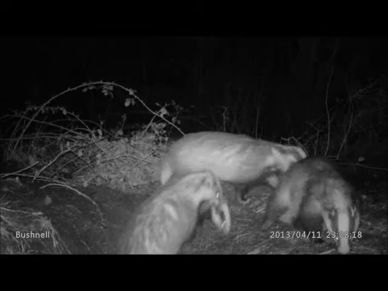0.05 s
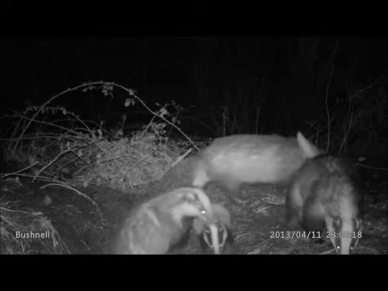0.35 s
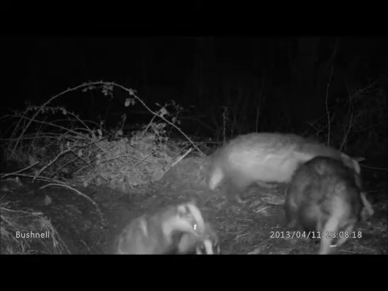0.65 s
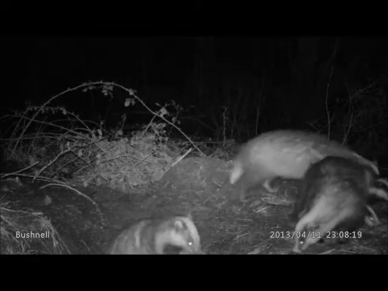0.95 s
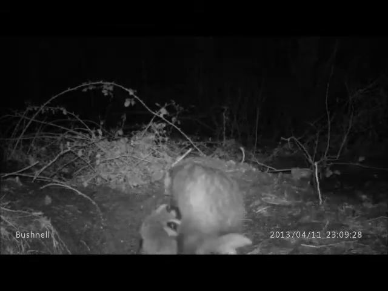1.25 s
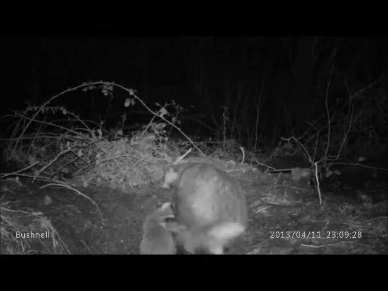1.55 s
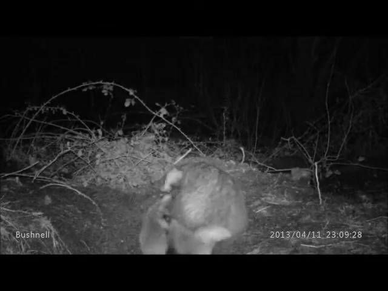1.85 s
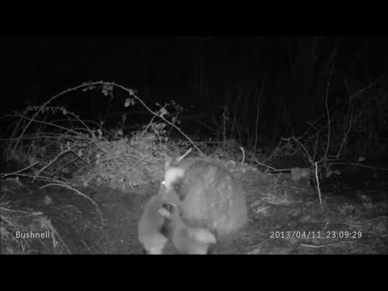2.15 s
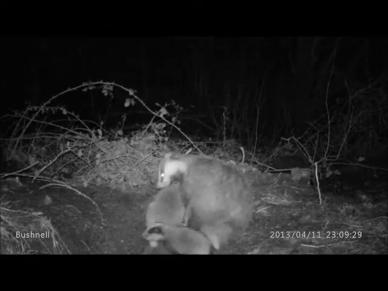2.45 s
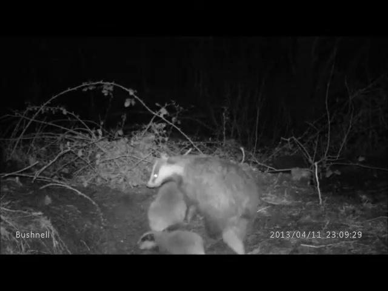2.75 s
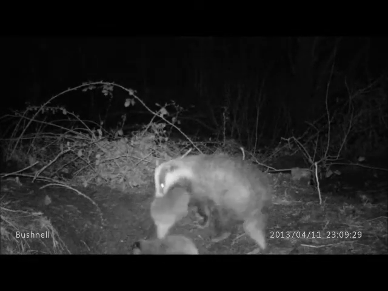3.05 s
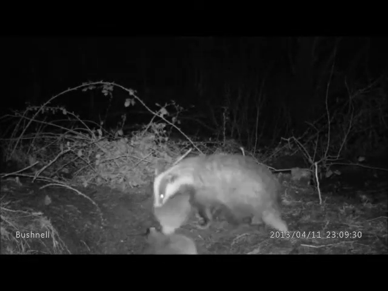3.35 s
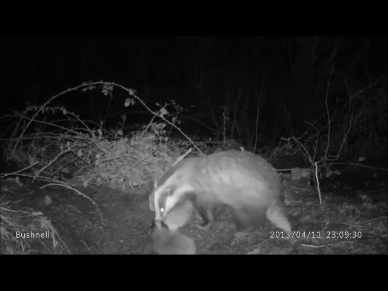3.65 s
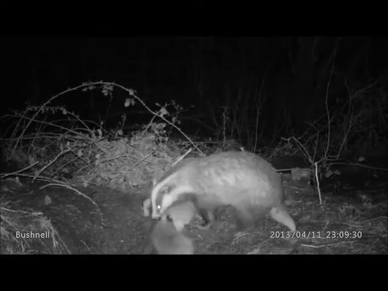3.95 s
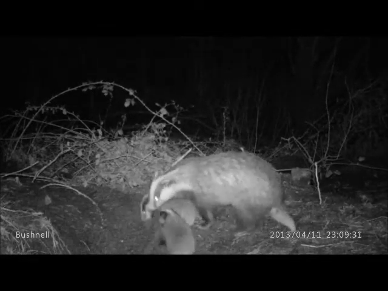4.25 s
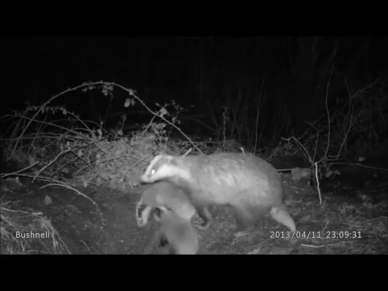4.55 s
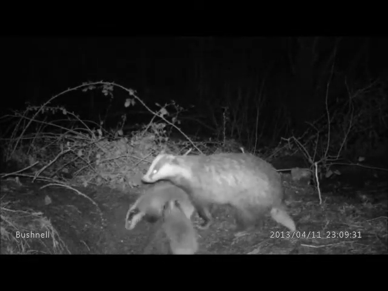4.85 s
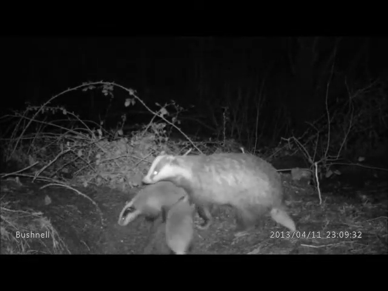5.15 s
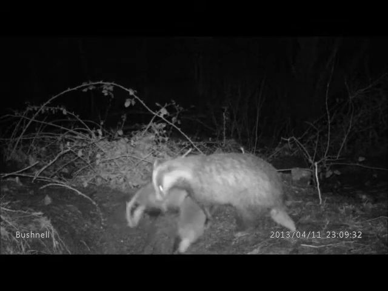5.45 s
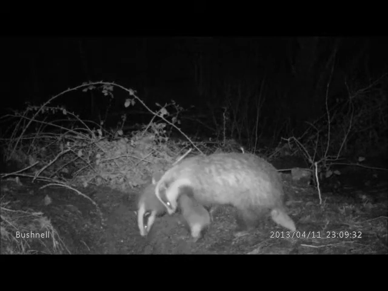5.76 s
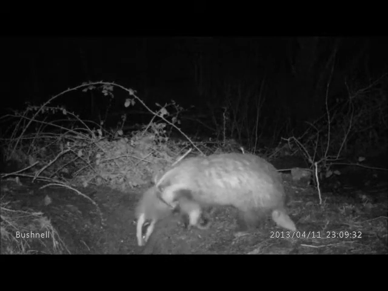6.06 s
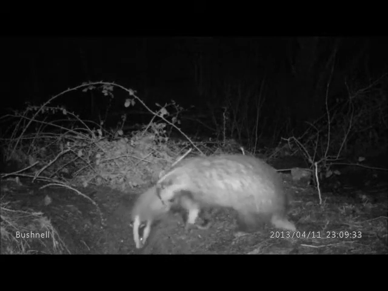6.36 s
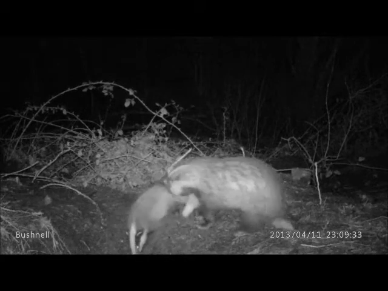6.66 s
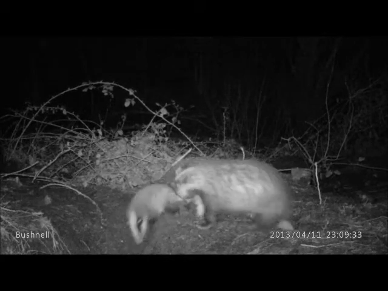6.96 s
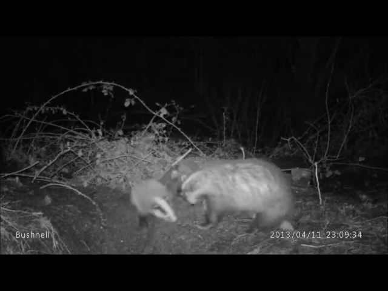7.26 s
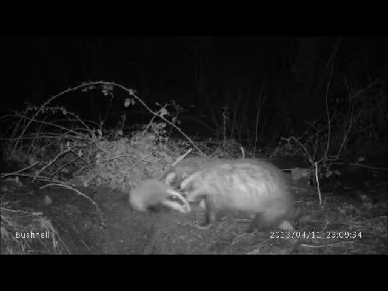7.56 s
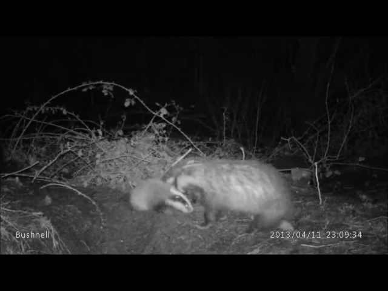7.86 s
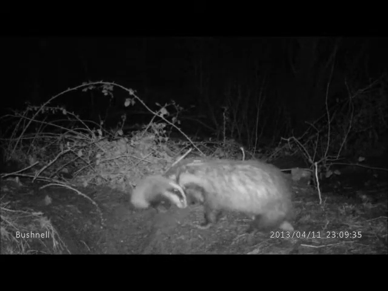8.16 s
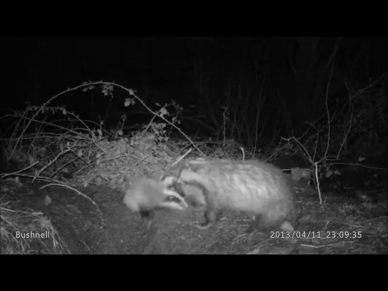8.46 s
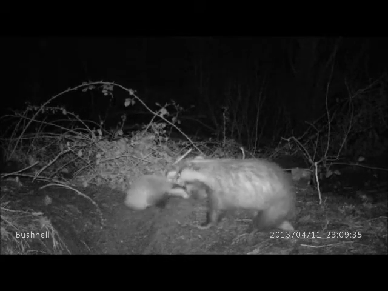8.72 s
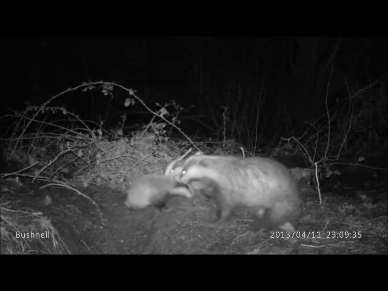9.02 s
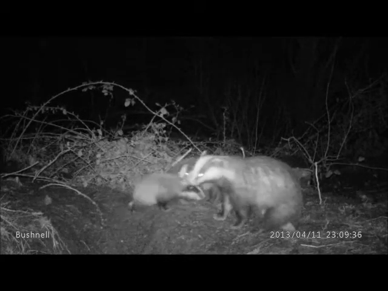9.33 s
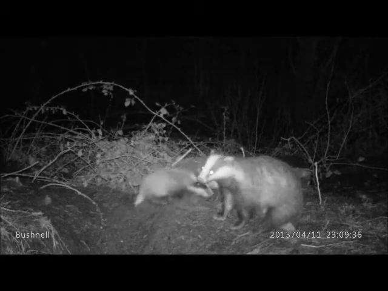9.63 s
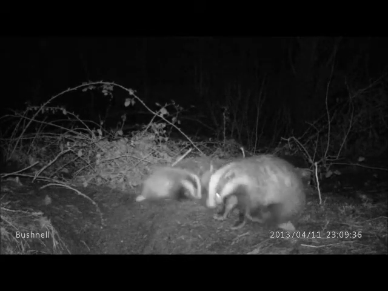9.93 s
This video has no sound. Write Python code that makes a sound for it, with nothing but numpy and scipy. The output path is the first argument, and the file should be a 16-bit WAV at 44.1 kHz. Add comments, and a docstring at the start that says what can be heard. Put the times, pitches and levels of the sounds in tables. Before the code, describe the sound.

Badgers are heard close to a trail camera in quiet woodland at night. Soft hiss, a thin high whine and a faint distant murmur run throughout, and the camera adds repeated runs of short, buzzy electrical ticks. A brief yelp comes right at the start and another at about 1 second, while paws crackle in dry litter and a few stalks snap, most sharply at 0.7 seconds. At 1.3 seconds the sound drops out for an instant with a click. From 2.4 seconds a cub chitters in high, raspy bursts of about eleven syllables a second, with occasional sharp squeaks and dull scuffles on the soil. The calls thin out between 4 and 6 seconds, then pick up until about 7. A soft grunt comes at 7.5 seconds. The longest, loudest chitter lasts from about 8.2 to 9.5 seconds. Everything sounds thin, with a gritty treble edge.

```python
"""Badgers at night, heard through a trail camera that hisses, whines and buzzes when it writes to its card.
First come two short yelps, while paws press into dry litter and snap a few stalks. At 1.3 s the camera
mutes briefly. From 2.4 s a cub chitters in bursts, quick pulses ringing in its throat, between scuffles
on the soil. A soft grunt comes at 7.5 s, then the longest, loudest chitter. All along, the night air
murmurs, and the camera holds each of its samples, which mirrors every sound into the treble."""
import sys
import numpy as np
from scipy import signal
from scipy.fft import rfft, irfft
from scipy.io import wavfile
from scipy.ndimage import uniform_filter1d

SR = 44100
rng = np.random.default_rng(int(sys.argv[2]) if len(sys.argv) > 2 else 0)


def to_wav(s):
    """Save 16-bit WAV."""
    ch = np.atleast_2d(s).T  # columns
    pcm = np.round(np.clip(ch, -1, 1) * 32767)  # PCM
    wavfile.write(sys.argv[1], SR, pcm.astype(np.int16))


N = 440559
TIME = np.arange(N) / SR


def undb(db):
    """Turn decibels into a number to multiply by."""
    return 10 ** (np.asarray(db) / 20)


def unit(x):
    """Scale a sound to an average (rms) size of 1."""
    return x / np.sqrt(np.mean(x ** 2) + 1e-20)


def curve(rows):
    """Join (time [s], value) rows by straight lines."""
    return np.interp(TIME, *np.transpose(rows))


def add(out, s, x):
    """Mix x into out, starting at s seconds."""
    i = max(int(s * SR), 0)
    out[i:i + len(x)] += x[:N - i]


def resonate(x, hz, width_hz):
    """A resonance: keep the sound near hz and weaken the rest."""
    return signal.lfilter(*signal.iirpeak(hz, hz / width_hz, fs=SR), x)


def noise(points):
    """Noise shaped by (frequency [Hz], level [dB per Hz]) points."""
    hz, db = np.transpose(points)
    grid = np.maximum(np.fft.rfftfreq(N, 1 / SR), 1)
    gain = undb(np.interp(np.log(grid), np.log(hz), db))
    return irfft(rfft(rng.standard_normal(N)) * gain, N) * np.sqrt(SR / 2)


def wander(rate):
    """Drift by about 1 either way, to a new random value rate times a second."""
    step = int(SR / rate)
    return uniform_filter1d(np.repeat(rng.standard_normal(N // step + 1), step), step)[:N]


def envelope(age, attack_s, length_s, release_s):
    """Rise smoothly, hold until length_s, then die away."""
    rise = np.sin(np.pi / 2 * np.clip(age / attack_s, 0, 1)) ** 2
    return rise * np.exp(-np.maximum(age - length_s, 0) / release_s)


def pip(hz, rise_s, glide, rasp):
    """A tiny tone that swells, fades and can slide in pitch, with a hoarse puff just above it."""
    age = np.arange(int(7 * rise_s * SR)) / (rise_s * SR)  # 1 at the loudest point
    phase = 2 * np.pi * (np.cumsum(hz * (1 + glide * (age - 1))) / SR + rng.random())
    puff = unit(resonate(resonate(rng.standard_normal(len(age)), hz + 500, 1600), hz + 500, 2200))
    return (age * np.exp(1 - age)) ** 2 * (np.sin(phase) + rasp * puff)


def hiss_and_whine():
    """The camera's own soft hiss and thin whine, both wavering a little."""
    # the hiss from bass to treble: (frequency [Hz], relative level [dB])
    hiss_shape = [(40, -73.5), (130, -78.5), (220, -82.5), (420, -89), (560, -88.5), (800, -87),
                  (1250, -95.5), (1550, -97.5), (2050, -96.5), (2500, -99.6), (3200, -96), (4100, -96),
                  (4700, -99.8)]
    hiss = noise(hiss_shape) * undb(-2.15 + .5 * wander(5))
    whine_hz = 5169 + 5 * wander(30)
    return hiss + undb(-72) * np.sin(2 * np.pi * np.cumsum(whine_hz) / SR)


def card_writes():
    """Give (time [s], blocks) for each write; the camera then waits one fill time per block stored."""
    # rounds of writing to the card: (start [s], two-block writes [count], one-block writes [count])
    write_rounds = [(.231, 1, 4), (1.399, 0, 2), (1.798, 2, 0), (2.369, 1, 0), (2.599, 0, 5), (3.402, 2, 5),
                    (4.733, 2, 5), (6.067, 2, 7), (7.672, 2, 5), (9.009, 2, 3)]
    fill_s = .1338
    for s, long_count, short_count in write_rounds:
        for blocks in [2] * long_count + [1] * short_count:
            yield s, blocks
            s += blocks * fill_s


def card_buzz(surge_db, sag_db, fizz_db, surge_s, sag_s):
    """Each block opens with a spike; its two parts (sectors) each jolt the power up and down twice."""
    block_s, sector_s = .0168, .0077
    surge_times, sag_times = (.0021, .0044), (.0057, .0072)  # seconds into a sector
    t = TIME[:SR // 300]
    surge = np.exp(-t / surge_s)
    sag = np.exp(-(t / sag_s - 1) ** 4)
    spike = -undb(-31.8) * np.exp(-t / .00005)
    out = np.zeros(N)
    for s, blocks in card_writes():
        add(out, s + .013, .7 * spike)
        for block in range(blocks):
            start = s + block * block_s
            add(out, start + .0003, spike / (1 + block))
            for sector in (start, start + sector_s):
                for up, down in zip(surge_times, sag_times):
                    add(out, sector + up, undb(surge_db + 2.7 * rng.standard_normal()) * surge)
                    add(out, sector + down - sag_s, -undb(sag_db + 1.8 * rng.standard_normal()) * sag)
    # the data lines fizz while the card is busy
    busy = uniform_filter1d(np.abs(out), size=200)
    return out + undb(fizz_db) * busy * rng.standard_normal(N)


def night_air():
    """A far-off murmur that slowly sinks and swells again."""
    # loudness of the murmur: (time [s], level [dB])
    air_levels = [(0, -57.5), (1.6, -58), (3, -64), (5, -65.5), (7, -62.5), (9.99, -54)]
    murmur = unit(noise([(200, -12.5), (420, -7), (530, -10.5), (620, -7.5), (800, 2.5),
                         (1000, -7), (1250, -6), (1550, -16), (5000, -20)]))
    return murmur * undb(curve(air_levels) + wander(9.8))


def soil_scuffles():
    """Badgers shuffle on the soil with a dull, lumpy sound."""
    # scuffles that swell and fade: (middle [s], length [s], level [dB])
    scuffles = [(.4, 0.61, -58.5), (2.668, 0.2, -50.5), (3.7, 0.6, -56), (6.254, 0.34, -57),
                (6.85, 0.55, -65), (8.406, 0.23, -60), (9.096, 0.62, -55.5)]
    resting_db = -72  # the animals shift their weight between scuffles
    lumps = undb(2.8 * wander(22))
    rumble = noise([(40, -38), (95, -12), (135, -2.5), (180, -14), (300, -18.5), (600, -31), (2000, -53)])
    swells = sum(undb(db) * np.exp(-2 * ((TIME - s) / length) ** 2) for s, length, db in scuffles)
    return unit(lumps * rumble) * np.hypot(swells, undb(resting_db))


def woodland_echo(x, fade_s, db):
    """Trunks and undergrowth scatter back a faint echo that drops 60 dB in fade_s."""
    t = TIME[:SR // 2]
    tail = rng.standard_normal(len(t)) * undb(-60 * t / fade_s) * (t > .008)
    return x + undb(db) * signal.fftconvolve(x, tail / np.sqrt(np.sum(tail ** 2)))[:N]


def litter_rustle():
    """Dry stalks on the ground crackle in uneven clumps under paws and bodies."""
    # paws pressing down: (time [s], level [dB])
    paws = [(.07, -51), (.22, -58), (.29, -60), (.44, -66), (.57, -49), (.65, -57), (.84, -52),
            (.95, -50.5), (1.05, -53), (1.22, -55.5)]
    # bodies brushing through: (time [s], level [dB])
    brushing = [(0, -59.5), (.8, -56), (1.8, -62.5), (2.3, -66), (3.8, -65), (4.4, -68), (5.6, -68.5),
                (6.2, -67.5), (8, -65), (9.99, -63.5)]
    ticks = (rng.random(N) < 2000 / SR) * rng.standard_normal(N)  # about 2000 a second
    ticks *= undb(.63 * np.minimum(rng.exponential(size=N), 4))
    crackle = (unit(ticks) + .7 * rng.standard_normal(N)) * undb(2.2 * wander(70))
    upper = resonate(resonate(crackle, 3655, 710), 4080, 870)
    lower = resonate(resonate(crackle, 3300, 390), 3170, 630)
    steps = sum(undb(db) * envelope(TIME - s, attack_s=.01, length_s=.01, release_s=.062)
                for s, db in paws)
    return unit(upper + undb(-5) * lower) * np.hypot(steps, undb(curve(brushing)))


def stalk_snaps():
    """Stalks snap and ring briefly; a loud one splinters in three fading cracks."""
    # snapping stalks: (time [s], relative level [dB], pitch [Hz])
    snaps = [(0.0833, -28.5, 4130), (0.4857, -34, 3940), (0.559, -32.5, 4150), (0.579, -33, 3900),
             (0.67, -36.5, 4950), (0.7276, -18.5, 4050), (0.7421, -25.5, 4000)]
    splinter_above_db, gap_s, fade_db = -25, .0038, 2.5
    out = np.zeros(N)
    for s, db, hz in snaps:
        for crack in range(3 if db > splinter_above_db else 1):
            snap = pip(hz, rise_s=.0008, glide=0, rasp=.2)
            add(out, s + crack * gap_s, undb(db - 4 - crack * fade_db) * snap)
    return out


def yelps_and_grunt():
    """Each note slides into pitch, rasping once a cycle, and grows until it breaks into a low growl."""
    # notes of two yelps (a squeal, then a falling bark) and a soft two-note grunt: (start [s], length [s],
    # starting level [dB], first pitch [Hz], last pitch [Hz], overtones [dB], rasp [dB], growl [dB])
    notes = [(.006, 0.012, -45.5, 1250, 1165, -25, -2, -23), (0.023, 0.011, -31, 693, 752, -41, -11, -11.5),
             (.036, .007, -44, 440, 300, -12, -9, -8), (1.045, 0.026, -36.5, 1146, 1253, -0.5, -17, -12.5),
             (1.07, 0.012, -39.5, 835, 757, -27, -8.5, -6), (7.455, 0.0078, -48, 380, 480, -17, -15, -15),
             (7.463, 0.0096, -48, 274, 254, -7, -11, -15)]
    attack_s, slide_s, swell_db_per_s = .0079, .0065, 162
    out = np.zeros(N)
    t = TIME[:SR // 10]
    for s, length, db, first_hz, last_hz, overtone_db, rasp_db, growl_db in notes:
        pitch_hz = last_hz + (first_hz - last_hz) * np.exp(-t / slide_s)
        phase = 2 * np.pi * np.cumsum(pitch_hz) / SR
        rasp = unit(resonate(rng.standard_normal(len(t)) * (1 + np.cos(phase)), 3170, 600))
        growl = unit(resonate(resonate(rng.standard_normal(len(t)), 440, 530), 370, 670))
        overtones = np.sin(2 * phase) + undb(-18.5) * np.sin(3 * phase)
        voice = np.sqrt(2) * (np.sin(phase) + undb(overtone_db) * overtones) + undb(rasp_db) * rasp
        swell = undb(swell_db_per_s * np.minimum(t, length))
        add(out, s, undb(db) * swell * voice * envelope(t, attack_s, length, release_s=.0031))
        add(out, s, undb(db + growl_db) * growl * envelope(t, attack_s, length, release_s=.008))
    return out


def syllable(length, lower_hz, upper_hz, upper_db, effort):
    """One short call: uneven pulses ring two throat resonances, swelling and dying away."""
    # more effort (0 to 1) makes the pulses crowd together, turn rough and fall in pitch
    pulses_per_s, rasp, fall = 72 + 100 * effort, .35 + .16 * effort, .092 * effort
    rise_s, glide, wobble = .0022, .008, .027
    out = np.zeros(N // 40)
    s = 0
    for gap, size, upper_size, bend, upper_bend in rng.standard_normal((30, 5)):
        if s > max(length - 2 * rise_s, 0):
            break
        gain = undb(3 * size) * (.85 + .24 * np.sin(np.pi * s / max(length, rise_s)))
        lower = pip(lower_hz * (1 + wobble * bend + fall * (.5 - s / length)), rise_s, glide, rasp)
        upper = pip(upper_hz * (1 + 2 * wobble * upper_bend), rise_s, glide, rasp)
        add(out, s, gain * (lower + undb(upper_db + 2 * upper_size) * upper))
        s += np.exp(.25 * gap) / pulses_per_s
    return out * np.sqrt(max(length, rise_s) * SR / np.sum(out ** 2))


def cub_chitter():
    """The cub calls in bursts of about eleven syllables a second, with a few sharp squeaks on top."""
    # evenly paced bursts: (start [s], syllables [count], spacing [s], syllable length [s])
    bursts = [(2.446, 7, .093, .05), (3.287, 7, 0.084, 0.059), (4.055, 2, 0.09, .046),
              (4.766, 1, 0.1, .043), (5.192, 1, 0.082, 0.065), (5.9, 7, 0.082, .052),
              (6.527, 3, 0.11, 0.044), (6.983, 2, .1, .05), (8.201, 2, .085, 0.042),
              (8.367, 12, 0.093, .057)]
    # the changing voice: (time [s], relative level [dB], lower resonance [Hz], upper over lower [dB])
    voice = [(2.47, -62, 3230, -1), (2.741, -58.5, 3160, -1), (2.95, -64, 3213, 12),
             (3.319, -58.5, 3190, -3), (3.52, -59.5, 3230, 6), (3.85, -63.5, 3270, 5),
             (4.078, -56.5, 3220, 3), (4.17, -65, 3300, 10), (5.22, -60, 3240, 15), (5.95, -66.5, 3100, -4),
             (6.19, -57.5, 3280, 18), (6.449, -57, 3245, 7), (6.55, -59, 3170, -7), (6.75, -60, 3260, 6),
             (7.01, -53, 3260, -4), (7.11, -61, 3210, 7), (8.221, -54.5, 3210, -5),
             (8.309, -59.5, 3200, -9.5), (8.41, -52.5, 2930, -1.5), (8.679, -52.5, 2760, -2),
             (8.78, -49, 2720, -11), (8.95, -49, 2864, -2.5), (9.058, -54.5, 3200, -7),
             (9.15, -51.5, 3080, -24), (9.25, -53.5, 2940, -12), (9.342, -52.5, 3010, -13.5),
             (9.44, -59, 3190, 7)]
    # the sharpest squeaks: (time [s], relative level [dB], pitch [Hz])
    squeaks = [(3.3288, -42, 3260), (3.488, -42, 4500), (5.928, -45, 2900), (6.1635, -39, 3860),
               (6.3595, -38, 3220), (6.4214, -39.5, 3870), (6.7213, -44, 3230), (6.991, -36.5, 3440),
               (8.21, -37, 3200), (8.4016, -39, 2640), (8.6723, -34.5, 4270), (8.7798, -33, 2770),
               (8.837, -39, 3170), (8.8688, -40, 2649), (8.9211, -37, 3792), (8.9668, -37.5, 2640),
               (9.0557, -34, 3300), (9.1233, -37, 3095), (9.1552, -36, 3227)]
    # narrow resonances that colour all the chitter: (frequency [Hz], width [Hz], gain [dB])
    resonances = [(2680, 67, 13.5), (3196, 63, 3.5), (4300, 230, -6)]
    soft_db, effort_range_db = -60, 8
    lower_rest_hz, upper_rest_hz = 3180, 3960
    out = np.zeros(N)
    times, *columns = np.transpose(voice)
    for first, count, spacing, length in bursts:
        for start in first + spacing * np.arange(round(count)):
            db, lower_hz, upper_db = (np.interp(start + length / 2, times, column) for column in columns)
            effort = np.clip((db - soft_db) / effort_range_db, 0, 1)
            upper_hz = upper_rest_hz + .61 * (lower_rest_hz - lower_hz)  # rises as the lower one sinks
            add(out, start, undb(db) * syllable(length, lower_hz, upper_hz, upper_db, effort))
    for s, db, hz in squeaks:
        add(out, s, undb(db - 5.5) * pip(hz, rise_s=.0018, glide=-.004, rasp=.4))
    ringing = sum(undb(db) * resonate(out, hz, width) for hz, width, db in resonances)
    return undb(-3.5) * (out + ringing)


def scene():
    """Everything that reaches the camera's single channel, copied to left and right."""
    badgers = cub_chitter() + yelps_and_grunt() + litter_rustle() + stalk_snaps()
    mono = woodland_echo(badgers, fade_s=.14, db=-16.5) + hiss_and_whine()
    mono += card_buzz(surge_db=-42.5, sag_db=-43.5, fizz_db=4.5, surge_s=.0005, sag_s=.00018)
    mono += soil_scuffles() + night_air()
    return np.array([mono, mono])


def record(dry):
    """The camera holds each sample and mutes once; the left side sits off zero, the right loses bass."""
    camera_hz, top_hz = 12000, 15200
    mute_s, wake_s = 1.277, 1.352
    coarse = signal.resample(dry, round(N * camera_hz / SR), axis=1)
    coarse = signal.sosfilt(signal.butter(1, 5400, fs=camera_hz, output="sos"), coarse)
    held = np.repeat(coarse, 4, axis=1)  # these stair steps mirror the sound into the treble
    left, right = signal.resample(held, N, axis=1)
    right = signal.sosfilt(signal.butter(1, 330, "high", fs=SR, output="sos"), right)
    awake_s = np.maximum(TIME - wake_s, 0)
    live = np.where(TIME < mute_s, 1, np.minimum(awake_s / .006, 1))
    # the offset from zero drops out with a click, then overshoots and settles as the input wakes
    settle = 1 - np.exp(-(awake_s / .011) ** 4) * (1 + .45 * np.sin(np.pi * awake_s / .011))
    offset = -.044 * np.where(TIME < mute_s, 1, settle)
    out = np.array([left * live + offset, right * live])
    treble_cut = signal.ellip(12, .2, 70, top_hz, fs=SR, output="sos")
    first = out[:, :1]  # filtering around the first value avoids a click at the start
    return signal.sosfilt(treble_cut, out - first) + first


dry = scene()
out = record(dry)
to_wav(out)
```